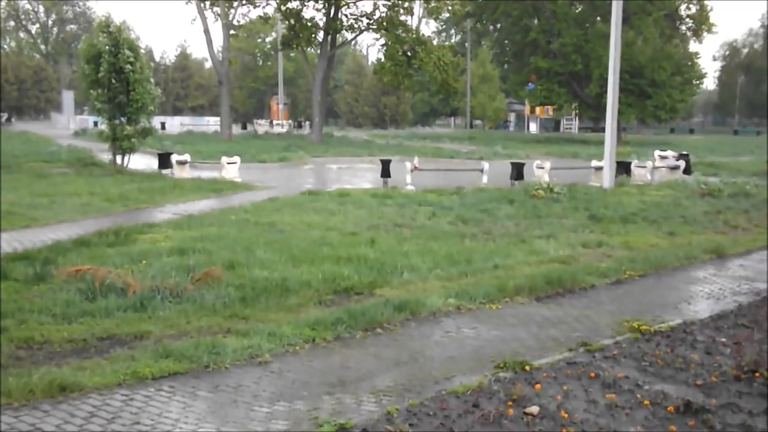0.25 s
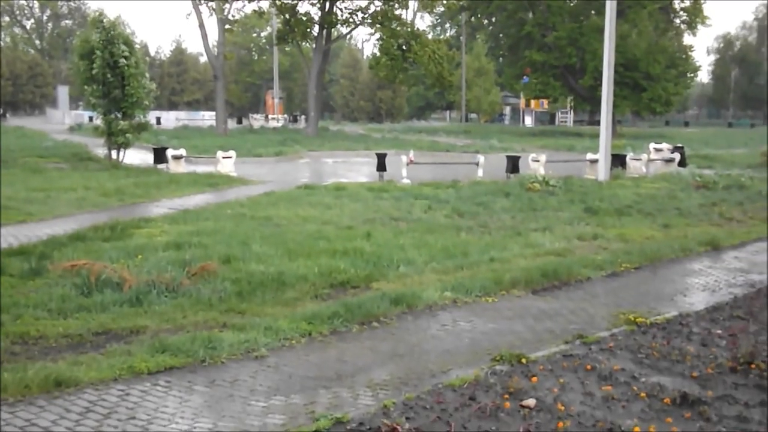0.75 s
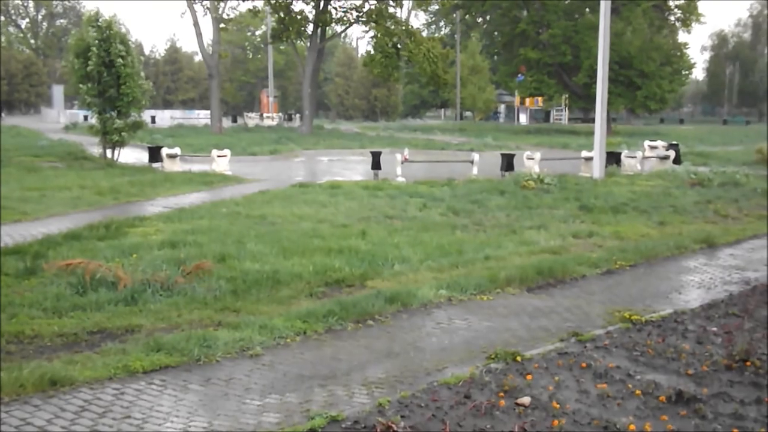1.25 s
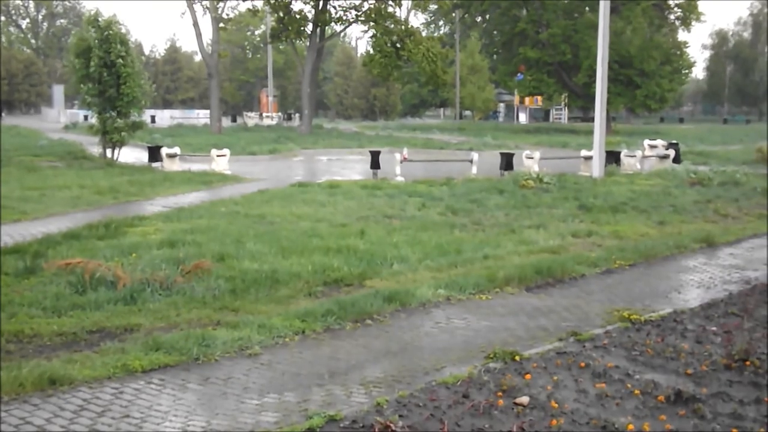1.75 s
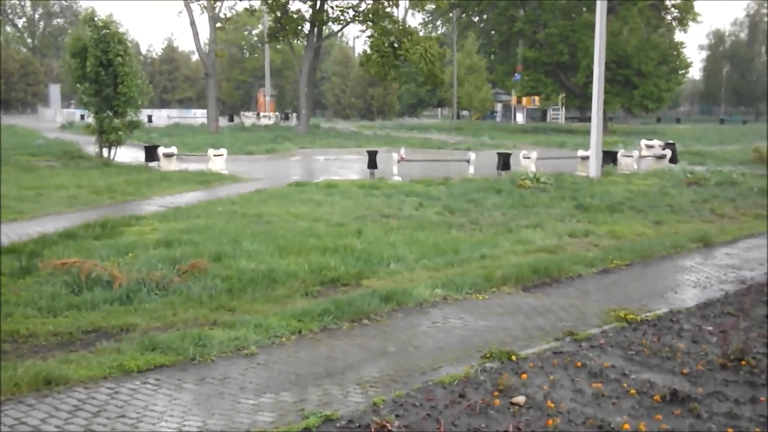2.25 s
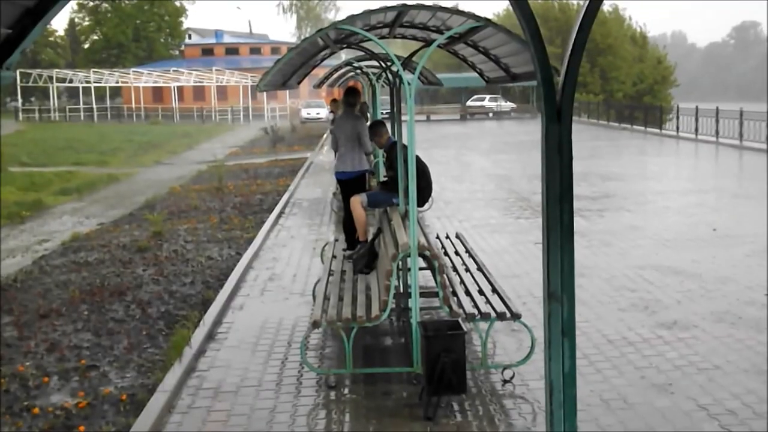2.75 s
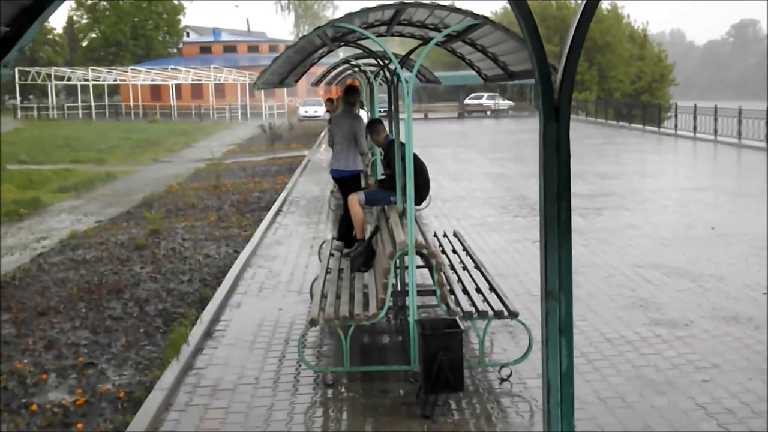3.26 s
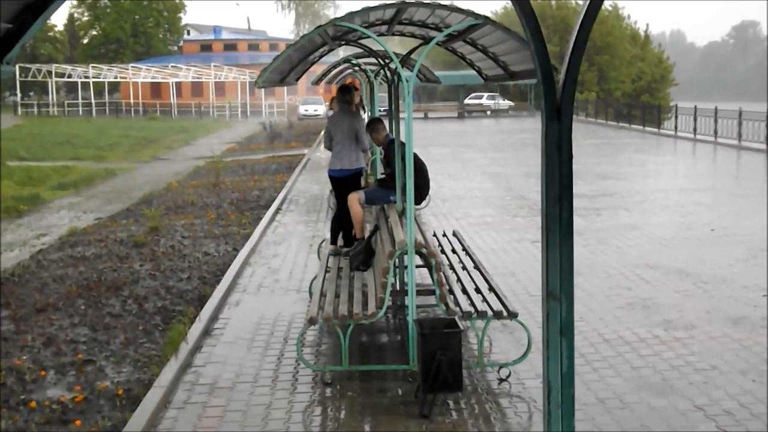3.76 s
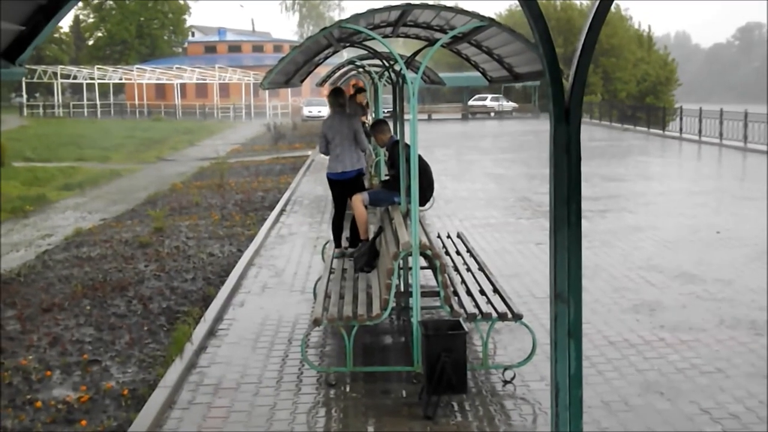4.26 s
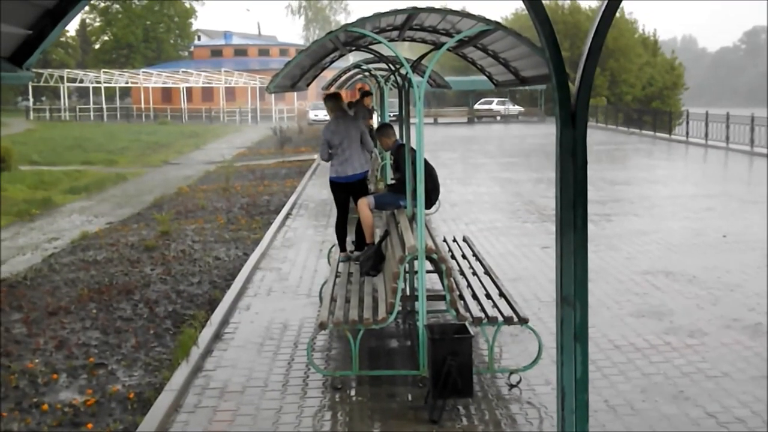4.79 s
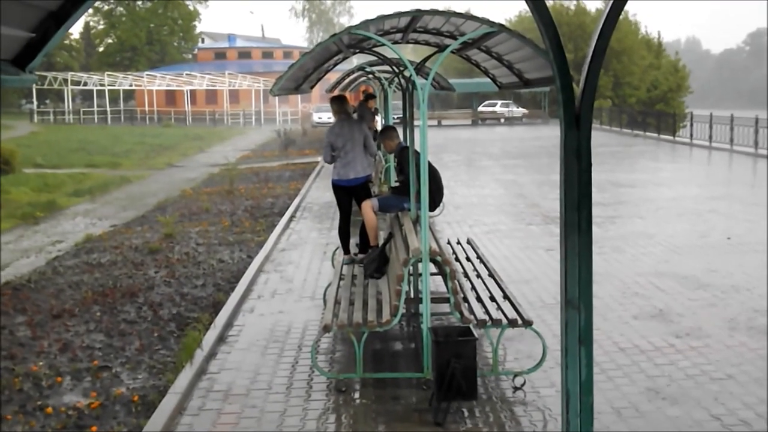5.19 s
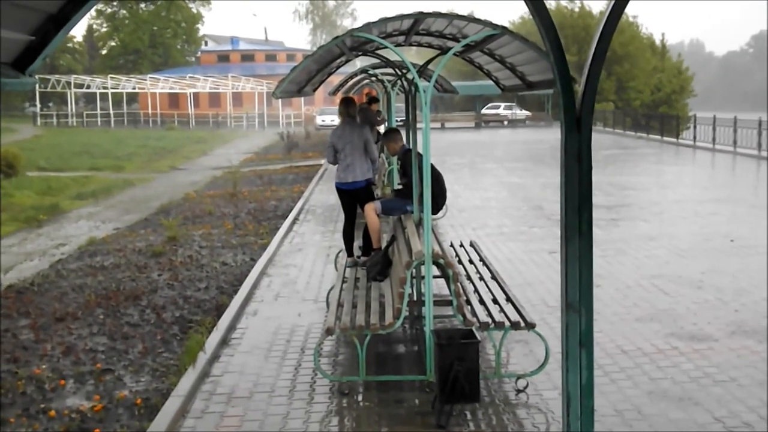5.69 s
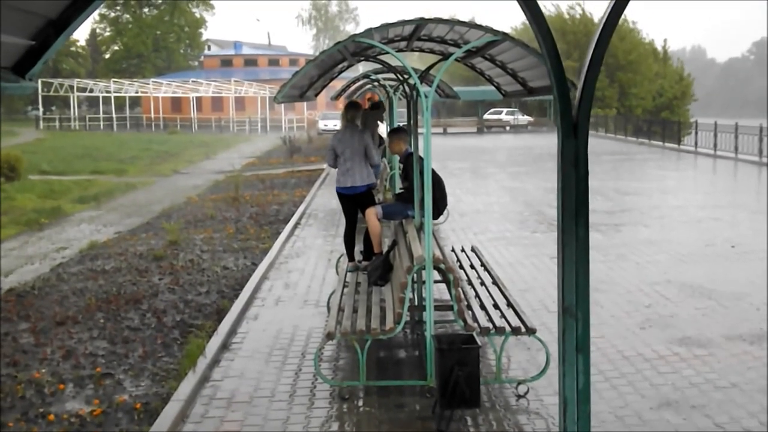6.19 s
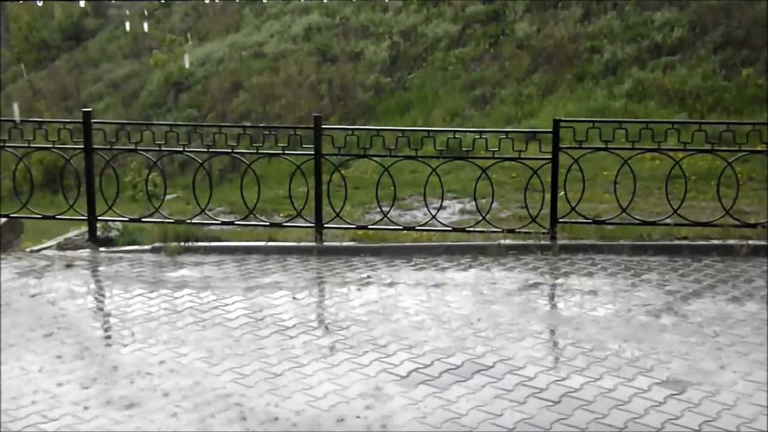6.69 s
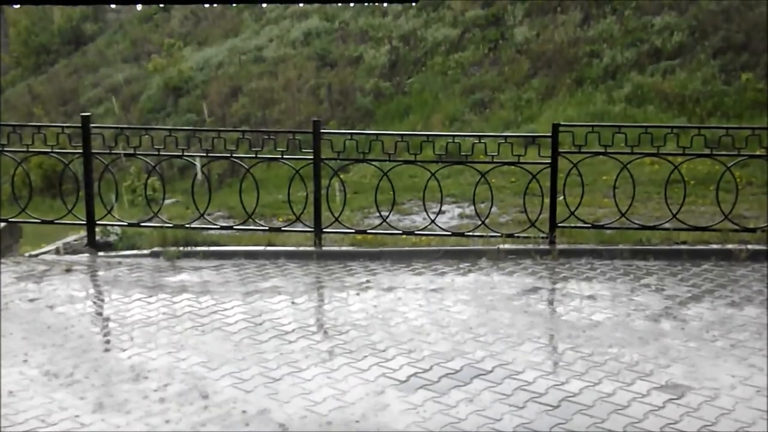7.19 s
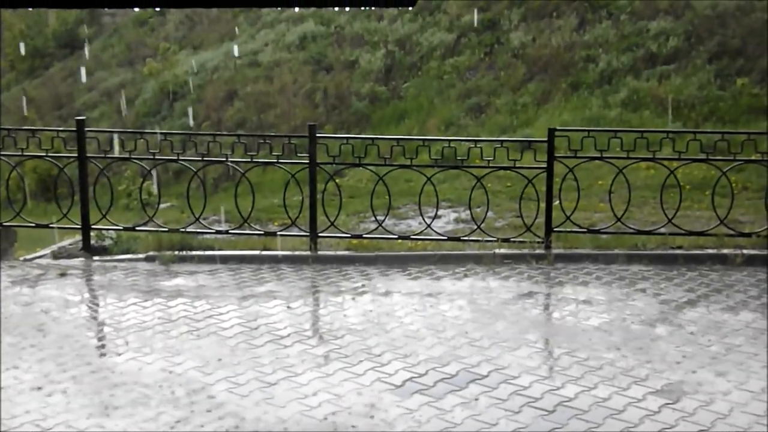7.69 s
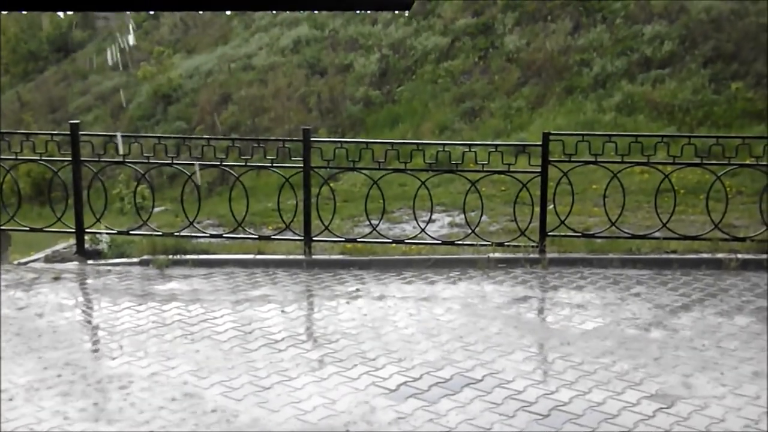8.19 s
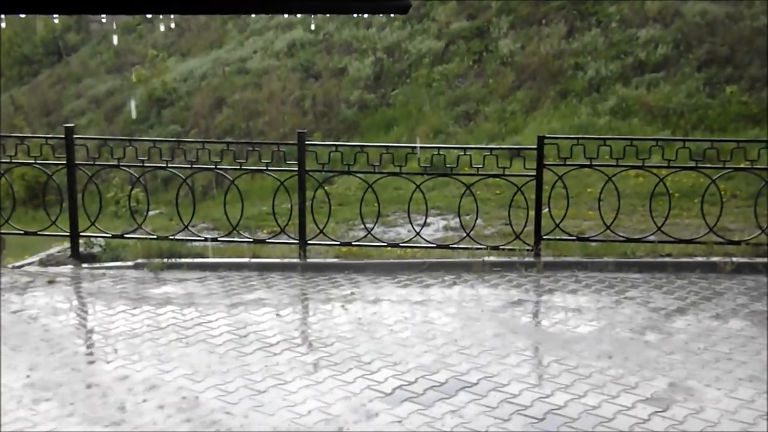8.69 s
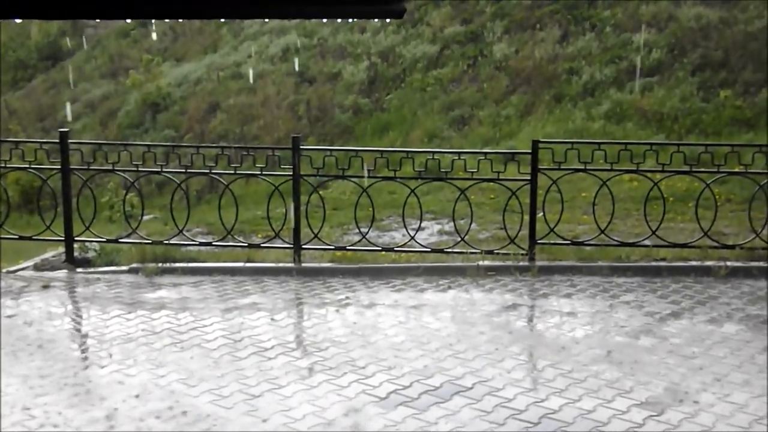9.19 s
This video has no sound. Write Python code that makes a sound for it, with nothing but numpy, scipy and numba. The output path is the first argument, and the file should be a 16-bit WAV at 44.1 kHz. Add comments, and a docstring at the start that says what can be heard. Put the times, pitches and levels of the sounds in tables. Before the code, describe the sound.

Heavy rain pours on wet paving beside a lawn, a dense hiss with near spatter, irregular loud knocks and a faint low rumble. A hard cut moves to a roofed bench, where gusts thump the microphone and bright spray and ticks appear. After a brief silence, similar rain resumes by a railing, slightly duller and windy. Close, essentially mono pickup, abruptly ducking after loud hits.

```python
"""Heavy rain in three places

Rain beats on wet paving by a park lawn, a roofed bench and a railing, with a short silence before the last.
Far drops merge into a steady hiss of noise, near ones spatter and loud knocks land as pulses, over a low rumble.
From the bench on, noise shaped by gust curves thumps the microphone, and fine spray patters among sharp ticks.
One microphone feeds both sides; on the lawn the left lags by one sample.
Sounds that pass the limiter's ceiling duck everything, which then swells back.
"""
import sys
import numpy as np
from scipy import signal
from scipy.fft import rfft, irfft, next_fast_len
from scipy.io import wavfile
from scipy.ndimage import uniform_filter1d, map_coordinates
from numba import njit

SR = 44100
rng = np.random.default_rng(int(sys.argv[2]) if len(sys.argv) > 2 else 0)


def pcm_store(signal):
    """Save signal as 16-bit PCM."""
    levels = np.round(np.clip(np.atleast_2d(signal), -1, 1) * 32767)
    wavfile.write(sys.argv[1], SR, levels.astype(np.int16).T)


N = 416744
TIME = np.arange(N) / SR
TOP_HZ = 15700

# Microphone places, in order lawn, bench, railing: (start [s], end [s], lag of left channel [samples])
PLACES = [(0, 2.344, 1), (2.352, 6.3445, 0), (6.523, 9.46, 0)]

# Low rumble, relative spectrum: (frequency [Hz], density [dB per Hz])
RUMBLE_SPECTRUM = [(10, -20.5), (25, 4.5), (60, -1), (95, 0), (130, -1.5), (300, -4.5), (420, -9),
                   (800, -44)]

# Wind on the microphone, relative spectra of slow buffet, fast flutter and roar:
# (frequency [Hz], density [dB per Hz])
BUFFET_SPECTRUM = [(3, -11.5), (10, 3.5), (20, 4), (35, 0), (60, -3), (110, -15), (220, -29), (600, -82)]
FLUTTER_SPECTRUM = [(40, -32.5), (90, 3.5), (135, 1), (230, -4.5), (380, -17.5), (700, -23), (2000, -76)]
ROAR_SPECTRUM = [(100, -35.5), (250, 2.5), (480, -0.5), (700, -9.5), (1100, -8), (2500, -52)]
# Slowly rising and falling breeze before the eddies: (time [s], buffet level [dB], flutter level [dB])
BREEZE = [(2.5, -38, -48), (3.0, -26.5, -32), (3.5, -37, -36), (3.95, -19.5, -48), (4.4, -24, -33),
          (4.6, -18, -38), (5.15, -25.5, -36.5), (5.6, -16, -42), (6.55, -23, -32), (7.1, -21.5, -26.5),
          (7.5, -26.5, -39), (8.0, -17.5, -23), (8.65, -14.5, -42), (9.45, -30, -54)]
# Gusts before the eddies: (time [s], length [s], buffet level [dB], flutter level [dB])
GUSTS = [(2.717, 0.079, -25, -37), (2.91, 0.038, -14, -31), (3.063, 0.036, -11, -20),
         (3.275, 0.022, -17.5, -29.5), (3.678, 0.02, -16.5, -20.5), (3.792, 0.044, -19.5, -41),
         (4.848, 0.078, -10.5, -28), (5.393, 0.092, -19, -48), (5.731, 0.013, -21.5, -24.5),
         (5.871, 0.015, -20, -18), (6.133, 0.2, -17, -17.5), (6.617, 0.051, -19, -23),
         (6.8, 0.042, -18, -22), (6.912, 0.034, -28, -20.5), (7.267, 0.06, -18.5, -21.5),
         (7.409, 0.03, -12.5, -16.5), (7.59, 0.1, -20, -20.5), (7.813, 0.096, -13.5, -23.5),
         (8.12, 0.041, -27.5, -23), (8.262, 0.048, -25.5, -25), (8.719, 0.077, -14, -31),
         (8.878, 0.045, -16, -27.5), (9.08, 0.029, -17, -46), (9.21, 0.04, -20.5, -47)]
# The one gust that roars, before the eddies: (time [s], length [s], level [dB])
ROARING_GUST = (6.18, 0.13, -18)
GUST_RISE_DB_PER_S, GUST_FALL_DB_PER_S = 604, 451
ROAR_RISE_DB_PER_S = 140

# Bright colour of the fine spray and the ticks, relative spectrum: (frequency [Hz], level [dB])
BRIGHT_SPECTRUM = [(1500, -36), (5000, -0.5), (8000, 7), (10000, -1.5), (15500, -13)]
# Sharp brief ticks, before trim and colour: (time [s], level [dB])
TICKS = [(2.6304, -25), (3.3034, -21), (4.4952, -36), (4.6654, -32.5), (4.7721, -28), (4.9048, -35),
         (5.5814, -36), (6.1315, -31), (6.7924, -32), (7.3178, -33), (7.426, -36), (7.6615, -27),
         (8.0094, -36)]

# Strength of the downpour before trim and unevenness: (time [s], level [dB])
POUR = [(0, -15), (0.7, -15.5), (1.4, -14), (1.85, -16), (2.45, -14.5), (2.75, -17), (3.4, -14),
        (3.75, -19), (4.3, -14), (4.9, -17), (5.07, -15), (5.5, -18.5), (6.08, -16.5), (6.55, -19.5),
        (7.08, -15.5), (7.5, -17.5), (8.35, -16), (8.95, -17.5), (9.3, -14)]
# Sudden loud knocks, from big drops or wind, before housing and limiter: (time [s], peak level [dB])
KNOCKS = [(0.0982, -1), (0.1563, 2.5), (0.3141, -1.5), (0.5926, -4), (0.7587, 0), (1.0523, 0),
          (1.6062, 2.5), (1.9005, -1.5), (1.97, -2), (2.3042, 0.5), (2.5615, 0), (2.651, 0), (2.9165, 2),
          (3.103, -0.5), (3.2379, 0.5), (3.6324, -0.5), (3.8872, -1), (4.396, 1), (4.5335, 0),
          (4.787, -0.5), (5.356, -3.5), (5.74, -1), (5.8766, 0.5), (6.1047, 0), (6.795, -1.5), (7.4387, 1),
          (7.8666, 0), (8.7004, -2.5)]
# Air that dulls the far wash: (frequency [Hz], gain [dB])
AIR = [(7000, 0), (10000, -2), (12000, -7), (15500, -10)]
# Colour of a splash in each place, relative spectra: (frequency [Hz], density [dB per Hz])
LAWN_SPLASH = [(180, -27.5), (300, -10.5), (391, -6.5), (543, -6), (674, -2.5), (794, -8.5), (937, -10.5),
               (1120, -6), (1750, -3.5), (2210, 3), (3810, -0.5), (5210, -14.5), (6460, -17.5),
               (8560, -32.5), (15500, -50)]
BENCH_SPLASH = [(180, -28), (300, -14.5), (417, -9), (685, -4.5), (769, -8.5), (953, -9), (1260, -7),
                (2140, 1), (3450, -2), (3750, -2), (4960, -15), (6790, -21.5), (7880, -29.5), (9140, -32.5),
                (15500, -58)]
RAILING_SPLASH = [(240, -39), (400, -14), (623, -8), (683, -8.5), (1150, -11.5), (1910, -4), (2120, -1),
                  (2970, -1), (3740, -3.5), (4840, -16.5), (6190, -20), (7320, -31), (9500, -38),
                  (11200, -50), (15500, -56)]

# Peaks and dips of the microphone housing: (frequency [Hz], width [Hz], gain [dB])
HOUSING = [(686, 33, 2), (800, 80, -1.5), (2214, 53, 1), (3770, 133, 2), (5480, 710, -2), (6360, 770, 2.5),
           (9950, 1500, 4)]


def amp(db):
    """Decibels to gain."""
    return 10 ** (np.asarray(db) / 20)


def unit(x):
    """Scale to rms 1."""
    return x / np.sqrt(np.mean(x ** 2) + 1e-20)


def curves(rows):
    """One value per sample for each column after the time."""
    times, *columns = np.transpose(rows)
    return [np.interp(TIME, times, column) for column in columns]


def wobble(rate):
    """A smooth random curve with this many knots a second."""
    knots = rng.standard_normal(int(N * rate / SR) + 4)
    return map_coordinates(knots, [TIME * rate])


def filtered(x, response):
    """Multiply the spectrum of x by a response of frequency."""
    size = next_fast_len(N + 8192)
    gains = response(np.fft.rfftfreq(size, 1 / SR))
    return irfft(rfft(x, size) * gains, size)[..., :N]


def pulse(spectrum, size=8192):
    """A causal minimum-phase pulse of energy 1: its energy arrives as early as the spectrum allows."""
    hz, db = np.transpose(spectrum)
    grid = np.fft.rfftfreq(size, 1 / SR)
    magnitude = amp(np.interp(np.log(grid + 1), np.log(hz + 1), db))
    # Folding the cepstrum onto positive time gives the minimum phase
    cepstrum = irfft(np.log(magnitude))
    cepstrum[1:size // 2] *= 2
    cepstrum[size // 2 + 1:] = 0
    shape = irfft(np.exp(rfft(cepstrum)))
    return shape / np.linalg.norm(shape)


def noise(spectrum):
    """Coloured noise of rms 1."""
    white = rng.standard_normal(N)
    return unit(signal.fftconvolve(white, pulse(spectrum))[:N])


def impacts(per_second, spread_db):
    """Randomly timed impacts of rms 1: many small ones, few large ones."""
    falls = rng.random(N) < per_second / SR
    sizes = amp(spread_db * np.minimum(rng.exponential(size=N), 4))
    signs = rng.choice([-1, 1], N)
    return unit(falls * sizes * signs)


def rumble():
    """A steady low rumble of coloured noise lies under every place."""
    return amp(-29) * noise(RUMBLE_SPECTRUM)


def gust(start, length, rise_db_per_s):
    """A gust rises, holds and dies away, in straight lines of decibels."""
    early = np.maximum(start - TIME, 0)
    late = np.maximum(TIME - start - length, 0)
    return amp(-rise_db_per_s * early - GUST_FALL_DB_PER_S * late)


def wind():
    """Breeze and gusts press on the microphone as slow buffet and quicker flutter; one gust also roars."""
    buffet, flutter = amp(curves(BREEZE))
    for start, length, buffet_db, flutter_db in GUSTS:
        swell = gust(start, length, GUST_RISE_DB_PER_S)
        buffet = buffet + amp(buffet_db) * swell
        flutter = flutter + amp(flutter_db) * swell
    start, length, roar_db = ROARING_GUST
    roar = amp(roar_db) * gust(start, length, ROAR_RISE_DB_PER_S)
    blowing = buffet * noise(BUFFET_SPECTRUM)
    blowing += flutter * noise(FLUTTER_SPECTRUM)
    blowing += roar * noise(ROAR_SPECTRUM)
    eddies = amp(1.3 * wobble(24))
    from_bench_on = TIME > PLACES[1][0]
    return from_bench_on * eddies * blowing


def ticks():
    """Sharp ticks are short bright noise bursts that die at once."""
    bursts = np.zeros(N)
    t = TIME[:SR // 20]
    for start, db in TICKS:
        burst = amp(-60 * t / 0.018) * rng.standard_normal(len(t))  # falls 60 dB in 18 ms
        bursts[round(start * SR):][:len(t)] += amp(db - 3) * burst
    return signal.fftconvolve(bursts, pulse(BRIGHT_SPECTRUM))[:N]


def spray():
    """Fine droplets patter brightly in flurries, more strongly as the rain swells."""
    pour_db = curves(POUR)[0]
    flurries_db = 1.6 * (pour_db - pour_db.mean()) + 3 * wobble(11) + 3.5 * wobble(70)
    patter = unit(amp(flurries_db) * impacts(per_second=590, spread_db=1.0))
    from_bench_on = TIME > PLACES[1][0]
    hits = amp(-53.5) * patter * from_bench_on
    return signal.fftconvolve(hits, pulse(BRIGHT_SPECTRUM))[:N]


def rain(splash_spectrum):
    """Far wash, near patter and loud knocks all take the colour of one splash on wet paving."""
    splash = pulse(splash_spectrum)
    far = filtered(rng.standard_normal(N), lambda hz: amp(np.interp(hz, *np.transpose(AIR))))
    near = amp(-6.0) * impacts(per_second=1100, spread_db=3.0)
    sheets = amp(0.87 * wobble(34))  # the rain comes down unevenly
    pour = amp(curves(POUR)[0] - 0.46)
    hits = pour * sheets * (far + near)
    for start, db in KNOCKS:
        hits[round(start * SR)] += amp(db) / np.abs(splash).max()
    return signal.fftconvolve(hits, splash)[:N]


def housing(x):
    """The small cavity in front of the microphone lifts some bands and dips others."""
    def response(f):
        return amp(sum(db * np.exp(-2 * ((f - hz) / width) ** 2) for hz, width, db in HOUSING))
    return filtered(x, response)


def scene():
    """Each place has its own rain over the shared rumble, wind, ticks and spray."""
    around = rumble() + wind() + ticks() + spray()
    out = np.zeros((2, N))
    splashes = (LAWN_SPLASH, BENCH_SPLASH, RAILING_SPLASH)
    for (start, end, left_lag), splash_spectrum in zip(PLACES, splashes):
        inside = (TIME >= start) & (TIME < end)
        present = uniform_filter1d(1. * inside, size=6)  # soften the cuts
        place = housing(rain(splash_spectrum) + around) * present
        out += [np.roll(place, left_lag), place]
    return out


@njit
def peak_hold(level, ceiling, hold, fall):
    """Follow peaks over the ceiling at once, hold them, then let go."""
    out, held, wait = np.empty(len(level)), ceiling, 0.
    for i in range(len(level)):
        wait -= 1
        if level[i] > held:
            held, wait = level[i], hold
        elif wait < 0:
            held = max(ceiling, held * fall)
        out[i] = held
    return out


def limiter(x, ceiling_db, hold_s, release_db_per_s):
    """A peak over the ceiling abruptly pulls both channels down, then the level swells back."""
    ceiling = float(amp(ceiling_db))
    level = np.abs(x).max(axis=0)
    fall = float(amp(-release_db_per_s / SR))
    held = peak_hold(level, ceiling, float(hold_s * SR), fall)
    return x * uniform_filter1d(ceiling / held, size=3)


def record(dry):
    """Limiter, then a sharp cut of the top band."""
    limited = limiter(dry, ceiling_db=-2.04, hold_s=0.031, release_db_per_s=61)
    return filtered(limited, lambda hz: hz < TOP_HZ)


dry = scene()
out = record(dry)
pcm_store(out)
```